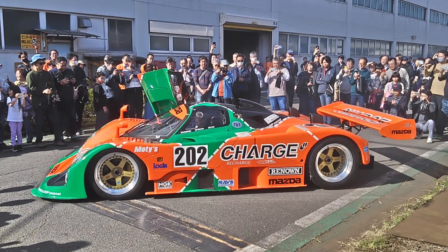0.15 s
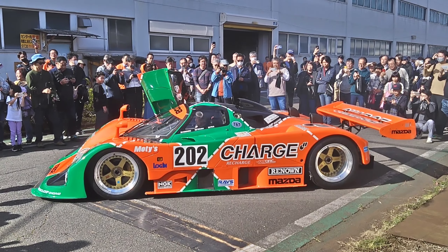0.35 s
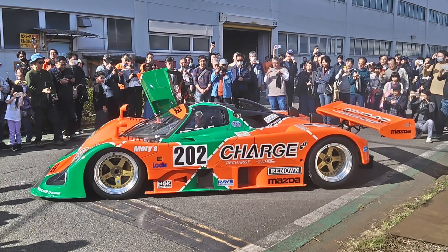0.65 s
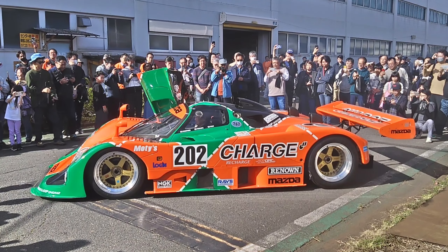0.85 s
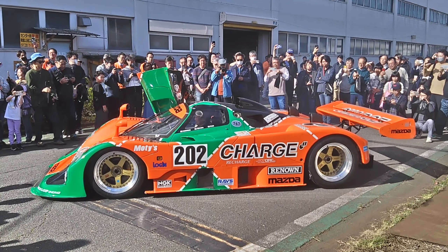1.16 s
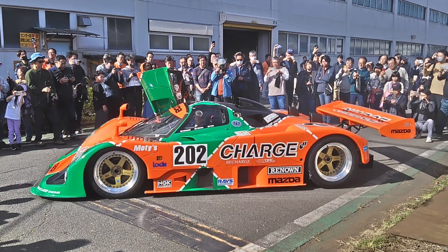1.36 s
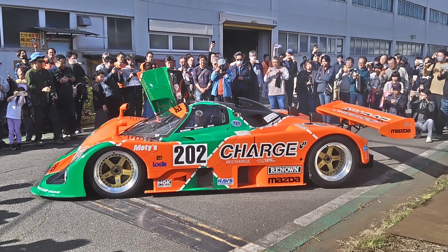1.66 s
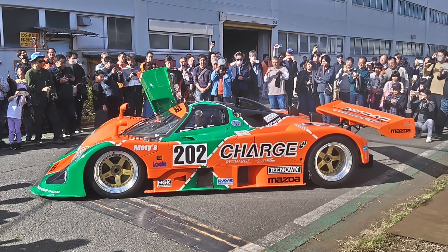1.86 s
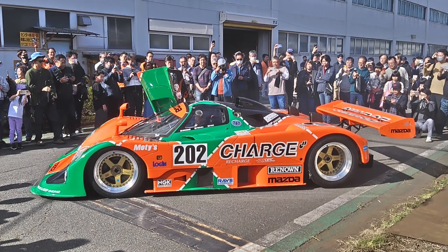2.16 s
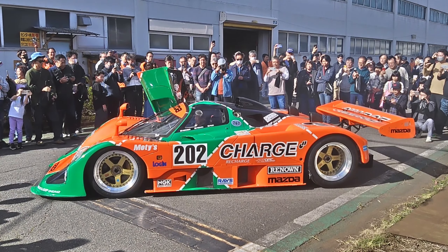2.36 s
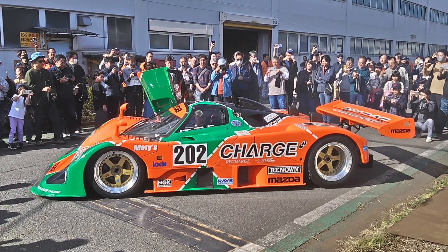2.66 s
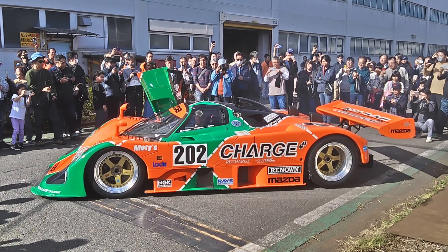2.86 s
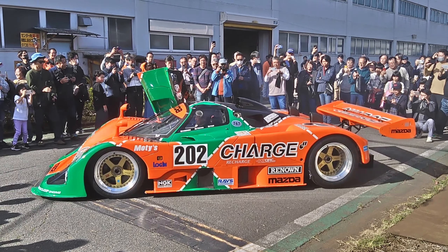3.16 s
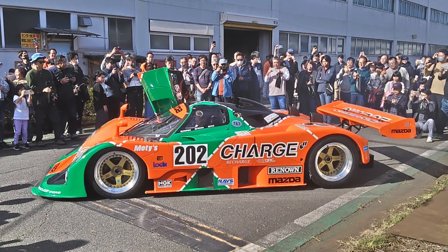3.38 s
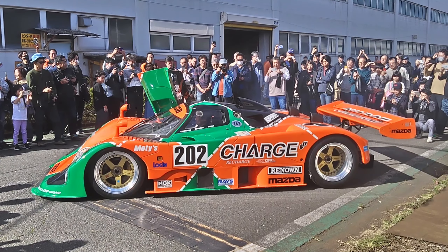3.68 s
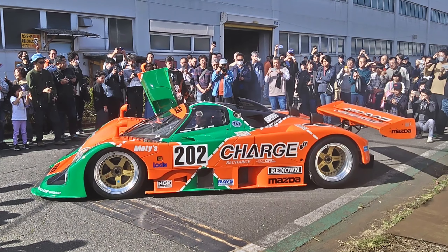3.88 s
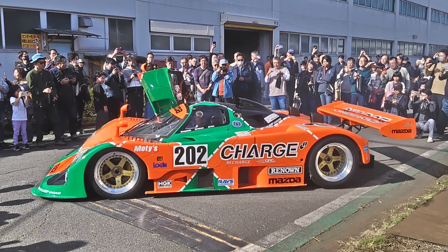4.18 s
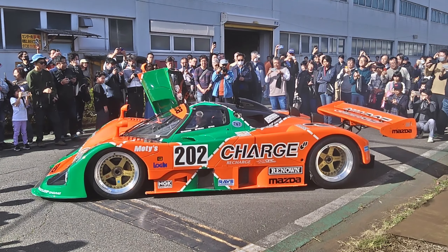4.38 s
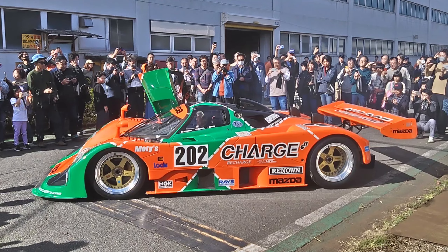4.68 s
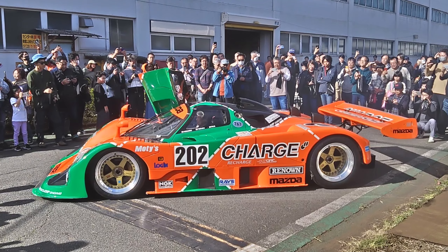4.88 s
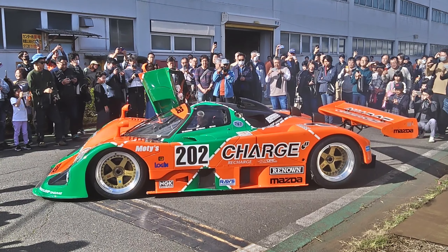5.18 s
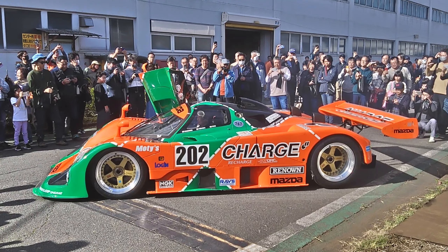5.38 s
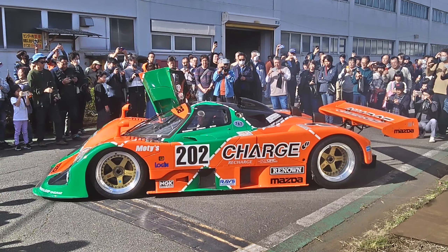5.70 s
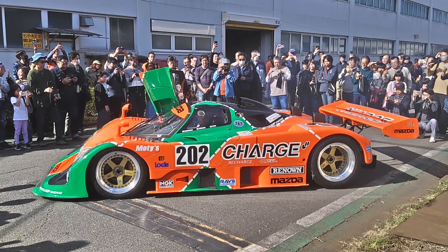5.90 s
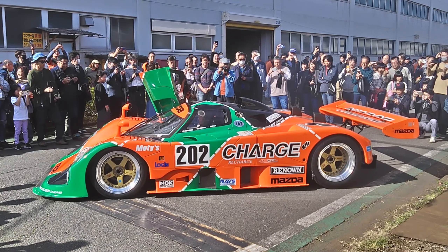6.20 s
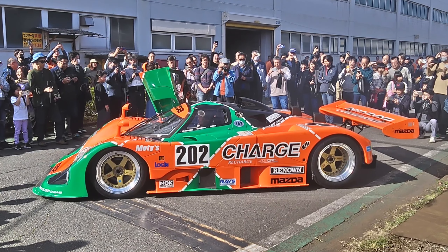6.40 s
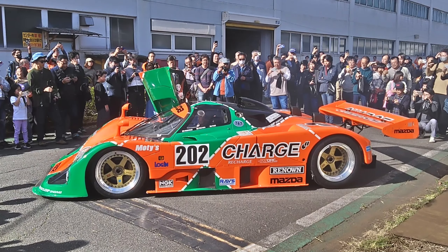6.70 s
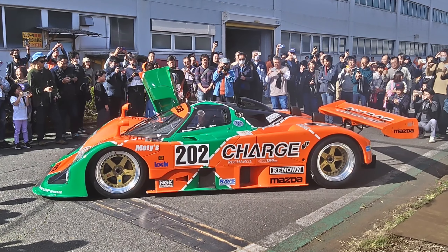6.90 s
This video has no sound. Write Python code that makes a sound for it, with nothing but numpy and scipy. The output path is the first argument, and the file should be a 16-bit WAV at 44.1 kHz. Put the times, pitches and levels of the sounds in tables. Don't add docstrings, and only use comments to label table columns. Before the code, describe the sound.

A racing rotary engine stands running in an open yard, heard in stereo from a few metres away, very loud with softly limited peaks. It begins already in a rev, lifting at about 0.1 s, then the pitch slides down in a hollow, lumpy, ringing burble. Around 0.7 s a small airy gasp and kick catch it, it stumbles, and at 0.85 s it rips upward in a raw, buzzing blare with rough exhaust roar and bright intake hiss. The same cycle returns with rips at about 1.7, 2.65, 3.55, 4.4, 5.35 and 6.25 s, each lasting only 0.1 to 0.2 s; those at 1.7 and 4.4 climb highest. Every lift brings a brief break-up and low thump before the slowing fall. A last catch comes near 7 s, with the engine still running. Tarmac and wall give short, hard echoes.

```python
import sys
import numpy as np
from scipy import signal
from scipy.fft import rfft, irfft, next_fast_len
from scipy.io import wavfile
from scipy.ndimage import uniform_filter1d

SR = 44100
rng = np.random.default_rng(int(sys.argv[2]) if len(sys.argv) > 2 else 0)


def gain_from_db(level_db):
    decades = np.asarray(level_db, float) / 20
    return 10 ** decades


def master(y):
    cut = np.clip(np.atleast_2d(y).T, -1, 1)
    pcm = np.round(cut * 32767)
    wavfile.write(sys.argv[1], SR, pcm.astype(np.int16))


N = 310905

# [f/Hz, correlation]
ALIKE = [(30, .96), (70, .78), (290, .95), (640, 0.27), (1200, 0.17), (2200, 0.56), (4000, 0.17),
         (15000, 0.1)]
# [catch t/s, lowest firing rate f/Hz, kick t/s, kick level/dB, air level/dB]
CATCHES = [
    (.66, 99.96, .74, -10, -40.5),
    (1.59, 84.85, 1.686, -12.5, -39.5),
    (2.453, 115, 2.51, -8.5, -40.5),
    (3.372, 100.9, 3.456, -7, -37.5),
    (4.27, 103.1, 4.355, -10.5, -41),
    (5.152, 107.9, 5.222, -8.5, -39),
    (6.012, 89, 6.07, -13, -41),
    (6.925, 99.97, 7.022, -8.5, -38.5),
]
# [floored t/s, pull t/s, firing rate in the stumble f/Hz, lift t/s, top firing rate f/Hz]
REVS = [
    (-.062, -.026, 110, .13, 353.1),
    (0.823, .855, 105.1, 1.0, 357),
    (1.676, 1.686, 99.1, 1.84, 453.1),
    (2.619, 2.664, 113, 2.772, 405.3),
    (3.502, 3.546, 118.1, 3.68, 408.7),
    (4.38, 4.398, 116.9, 4.548, 466),
    (5.312, 5.354, 90.95, 5.462, 361.8),
    (6.208, 6.244, 84.03, 6.352, 384.7),
]


def unit(x):
    return x / np.sqrt(np.mean(x ** 2) + 1e-20)


def along(points, hz):
    f, v = np.transpose(points)
    return np.interp(np.log(hz + 1), np.log(f + 1), v)


def filtered(x, response):
    m = next_fast_len(N + SR // 4)
    return irfft(rfft(x, m) * response(np.fft.rfftfreq(m, 1 / SR)), m)[..., :N]


def steady(x, seconds):
    size = int(seconds * SR)
    power = uniform_filter1d(uniform_filter1d(np.mean(x ** 2, axis=0), size), size)
    return x / np.sqrt(np.abs(power) + 1e-12)


def wobble(rate):
    return np.interp(np.arange(N) * rate / SR, np.arange(500), rng.standard_normal(500))


def per_sample(s, values):
    order = np.argsort(s)
    return np.interp(np.arange(N) / SR, s[order], values[order])


def patchy(x, depth_db):
    z = signal.stft(x, nperseg=1024)[2]
    field = uniform_filter1d(rng.standard_normal(z.shape[1:]), size=2, axis=0)
    field = unit(uniform_filter1d(field, size=5, axis=1))
    gain_db = depth_db * field - 6 * depth_db * (field < -.5)
    return signal.istft(z * gain_from_db(gain_db), nperseg=1024)[1][:, :N]


def rush(spectrum, gate, clean=0):
    # [f/Hz, lead of the left/rad]
    port_lead = [(0, 0), (780, 0.1), (1210, -5.0), (2070, -6.2), (3360, -6.9), (4390, 5.7), (5000, 6.3),
                 (6460, -0.2), (7410, -0.3), (8350, 3.7), (11300, 2.1), (12000, 9.8), (13300, 12.2),
                 (15900, 6.7)]

    def mid_and_side(hz):
        turn = np.arccos(np.clip(along(ALIKE, hz), -1, 1)) / 2
        return gain_from_db(along(spectrum, hz)) * [np.cos(turn), np.sin(turn)]

    pair = gate * rng.standard_normal((2, N)) + clean
    mid, side = filtered(pair, mid_and_side)
    return filtered(np.array([mid + side, mid - side]),
                    lambda hz: np.exp(.5j * along(port_lead, hz) * [[1], [-1]]))


def speed():
    kick_hz, bite_hz, pull_hz = 119.05, 121, 150.23
    stumble_s, bite_s, hang_s = .065, .025, .04
    drag_per_s, drag_grows = 1.25, 2.5
    catch, low_hz, kick, *_ = np.transpose(CATCHES)
    _, pull, sag_hz, lift, top_hz = np.transpose(REVS)
    since = np.linspace(0, 1, 12)[:, None] * (catch - lift - hang_s)
    fall = np.exp(-drag_per_s * (top_hz / 400) ** drag_grows * since)
    coast_hz = low_hz + (top_hz - low_hz) * (fall - fall[-1]) / (1 - fall[-1])
    s = [kick, pull - stumble_s, pull - bite_s, pull, lift, *(lift + hang_s + since)]
    hz = [kick_hz + 0 * kick, sag_hz, bite_hz + 0 * pull, pull_hz + 0 * pull, top_hz, *coast_hz]
    return per_sample(np.ravel(s), np.ravel(hz))


def effort(start, end, db, shape):
    before, after, attack_db, release_db = shape
    t = np.arange(0, N + 64, 64)[:, None] / SR
    rising_db = attack_db * np.clip(start - before - t, 0, None)
    dying_db = release_db * np.clip(t - end - after, 0, None)
    return per_sample(t[:, 0], np.sum(gain_from_db(2 * (db - rising_db - dying_db)), axis=1))


def levels(hz):
    # [f/Hz, level/dB]
    coasting = [(100, -20.5), (135, -25), (178, -20.5), (215, -25.5), (265, -25.5), (310, -29)]
    pulling = [(120, -10.5), (170, -12.5), (222, -8), (290, -11), (400, -12)]
    # (start before s, end after s, attack dB per s, release dB per s)
    note_rev, note_kick = (-0.0233, 0.0055, 283, 156), (0.0032, 0.0074, 170, 155)
    roar_rev, roar_kick = (-0.0455, 0.0052, 252, 197), (.01, .02, 144, 120)
    hiss_rev, hiss_kick = (-0.0361, 0.0141, 220, 163), (0.0099, 0.01, 226, 310)
    gasp, dab, miss = (-.018, .02, 650, 200), (-.018, -.015, 600, 300), (.0, .018, 200, 700)
    lumps, backfire = (0.01, 0, 496, 200), (-.004, 0, 245, 250)
    missed = 0.55

    catch, _, kick, kick_db, air_db = np.transpose(CATCHES)
    floored, _, _, lift, _ = np.transpose(REVS)
    stumble_end = np.append(floored[1:], N / SR + 1)

    def coast(db_at_100_hz, db_per_octave):
        return gain_from_db(2 * (db_at_100_hz + db_per_octave * np.log2(hz / 100)))

    note = gain_from_db(2 * along(coasting, hz)) * (1 - np.clip(missed * effort(catch, catch, 0, miss), 0, .95))
    note = note + effort(catch + 0.013, kick, kick_db - 8, gasp) + effort(kick, kick, kick_db, note_kick)
    note = note + gain_from_db(2 * along(pulling, hz)) * effort(floored, lift, 0, note_rev)

    roar = coast(-51.5, 6.5) + effort(kick, kick, air_db - 3, roar_kick) + effort(floored, lift, -18, roar_rev)

    hiss = coast(-57, 7.5) + effort(catch, kick, air_db - 3.5, gasp) + effort(kick, kick, air_db, hiss_kick)
    hiss = hiss + effort(catch, stumble_end, air_db - 8.5, dab) + effort(floored, lift, -30.5, hiss_rev)

    throb = coast(-52, 2) + effort(catch, stumble_end, -27, lumps)
    throb = throb + effort(floored, lift, -38, note_rev) + effort(lift, lift, -30.5, backfire)

    note_db, roar_db, hiss_db, throb_db = 10 * np.log10([note, roar, hiss, throb])
    return note_db, roar_db, hiss_db, throb_db, np.clip(effort(catch, stumble_end, 0, dab), 0, 1)


def firings(turns, load, scatter_db, jitter):
    # [level/dB, lateness/firings]
    rotors = [(-5, 0.0045), (-5.5, 0.026), (-6, -0.035), (-7.5, 0.0067)]
    count = np.arange(1, int(turns[-1]) - 1)
    size_db, late = np.array(rotors)[count % len(rotors)].T
    luck = rng.standard_normal((4000, 2))[count]
    uneven = 0.22 + np.interp(count, turns, load)
    at = np.interp(count + late + jitter * uneven * luck[:, 0], turns, np.arange(N))
    return np.bincount(at.astype(int), gain_from_db(size_db + scatter_db * uneven * luck[:, 1]), N)


def tone(turns, load):
    # [order, level under load/dB, level coasting/dB]
    orders = [(.25, -15.5, -16), (.5, -30, -7), (.75, -8, -28), (1, 2.5, 4), (1.5, -26, -11), (2, -3, -1.5),
              (3, -12.5, -9), (4, -11.5, -17), (5, -19.5, -45)]
    total = 0
    for k, on_db, off_db in orders:
        level_db = load * on_db + (1 - load) * off_db + (5.5 - 2 * load) * wobble(45)
        phase = 2 * np.pi * k * turns + (.35 + .2 * load) * wobble(60)
        total = total + gain_from_db(level_db) * np.cos(phase)
    return total


def pipe(f):
    # [f/Hz, width/Hz, level/dB]
    modes = [(112.4, 18, 3), (174.3, 16, 7.5), (219.2, 22.6, 3), (255.8, 19, -2.5), (324, 18, -9),
             (357, 5.9, -3), (384.3, 18.6, -3), (502.7, 16.6, 2.5), (572.6, 23.3, 1.5), (649, 6.8, -0.5),
             (710, 67, -1), (750, 20, -13.5), (771.4, 37.5, 2.5)]
    return sum((-1) ** k * gain_from_db(db) * 1j * f * w / (c * c - f * f + 1j * f * w)
               for k, (c, w, db) in enumerate(modes))


def blown(f):
    return 1j * f * 600 / (330 ** 2 - f * f + 1j * f * 600) / (1 + (f / 900) ** 8)


def yard(x, wet_db):
    # [left t/s, right t/s, level/dB]
    bounces = [
        (.0021, 0.0018, -12.5),
        (.0074, 0.0079, -19.5),
        (0.018, 0.0154, -28.5),
        (.041, .038, -23.5),
    ]
    # [f/Hz, t60/s]
    ringing = [(100, 0.27), (500, 0.3), (2000, 0.47), (10000, 0.16)]
    hz, t, (a, b) = signal.stft(rng.standard_normal((2, SR)), SR, nperseg=256)
    alike = np.clip(along(ALIKE, hz), 0, 1)[:, None]
    z = np.array([a, alike * a + np.sqrt(1 - alike ** 2) * b])
    z = z * gain_from_db(-60 * t / along(ringing, hz)[:, None])
    tail = signal.istft(z, SR, nperseg=256)[1]
    answer = np.pad(gain_from_db(wet_db) * tail / np.linalg.norm(tail[0]), ((0, 0), (1300, 0)))
    answer[:, 0] += 1
    for left, right, db in bounces:
        answer[[0, 1], [int(left * SR), int(right * SR)]] += gain_from_db(db)
    return signal.fftconvolve(x[None], answer, axes=1)[:, :N]


def exhaust_note(hz, turns, load, through, puffs, note_db, roar_db):
    # [f/Hz, level/dB per Hz]
    burble_spectrum = [(60, -27), (110, -6.5), (200, 1.5), (320, 1.5), (450, -10), (560, -6), (800, -9.5),
                       (900, -19.5), (1100, -42.5)]
    modes_fade, straight = 0.68, 1.33
    lumpy = rng.standard_normal(N) * (0.73 + 0.33 * puffs)
    burble = unit(filtered(lumpy, lambda f: gain_from_db(along(burble_spectrum, f))))
    burble = gain_from_db(.5 * (roar_db - note_db + 18.5) * (1 - through)) * burble
    rough = gain_from_db(.7 * note_db) * (gain_from_db(-15) * puffs + gain_from_db(-13) * burble)
    cut_db = -(1 - load) * np.clip(hz - 290, 0, 90) / 8
    drive = gain_from_db(.7 * note_db + cut_db) * unit(tone(turns, load)) + rough
    ringing = filtered(drive - modes_fade * through * rough, pipe)
    passing = filtered((0.08 + straight * through) * drive, blown)
    by_the_body = gain_from_db(.7 * note_db - 12) * burble
    return yard(ringing + passing + by_the_body, wet_db=-11)


def gas_roar(hz, load, pulses, puffs, roar_db, dab):
    # [f/Hz, level/dB per Hz]
    roar_spectrum = [(410, -47), (700, -2.5), (803, -7), (915, -14), (1050, -5), (1300, -11.5),
                     (1410, -9.5), (1530, -16), (1870, -13.5), (2130, -15.5), (2900, -27), (3770, -83),
                     (6380, -120)]
    roar = rush(roar_spectrum, 2.1 + 0.37 * puffs, clean=1.26 * load * unit(pulses))
    roar = patchy(roar, depth_db=3.2)
    edge = filtered(roar, lambda f: f > 2300)
    slow = np.clip((-30 - roar_db) / 14, 0, 1) * np.clip((230 - hz) / 200, .25, 1)
    return roar - edge * np.maximum(.9 * dab, slow)


def intake_hiss(puffs, hiss_db, dab):
    # [f/Hz, level/dB per Hz]
    intake_spectrum = [(1850, -13), (3150, 4), (3420, -2), (3760, -2), (4080, -2), (5460, -4.5),
                       (7080, -11), (9100, -3.5), (10700, -15.5), (14900, -22.5), (16000, -14)]
    dull_db, bright_db = -6.5, 5.5
    hiss = patchy(rush(intake_spectrum, .8 + .5 * puffs), depth_db=5)
    hiss = filtered(hiss, lambda f: 1 / (1 + (3200 / (f + 1)) ** 30))
    treble_gain = gain_from_db(0.2 * (hiss_db + 40.0) + bright_db * dab)
    hiss = hiss + filtered(hiss, lambda f: f > 10000) * (treble_gain - 1)
    return hiss + filtered(hiss, lambda f: f < 4300) * (gain_from_db(dull_db * dab) - 1)


def low_throb():
    # [f/Hz, level/dB per Hz]
    throb_spectrum = [(15, -52), (30, -1), (50, 4), (72, 18), (95, -5), (140, -46.5)]
    return rush(throb_spectrum, gain_from_db(5 * wobble(25)))


def engine():
    hz = speed()
    note_db, roar_db, hiss_db, throb_db, dab = levels(hz)
    turns = np.cumsum(hz) / SR
    load = np.clip(uniform_filter1d(np.gradient(hz) * SR, size=1300) / 500, 0, 1)
    through = np.clip(load * (hz - 130) / 120, 0, 1)
    pulses = firings(turns, load, scatter_db=2.5, jitter=.05)
    puff_s = 0.0034
    puffs = unit(signal.lfilter([1], [1, -np.exp(-1 / (puff_s * SR))], pulses))

    note = exhaust_note(hz, turns, load, through, puffs, note_db, roar_db)
    roar = gas_roar(hz, load, pulses, puffs, roar_db, dab)
    hiss = intake_hiss(puffs, hiss_db, dab)
    throb = low_throb()
    putter_db = 1.3 * (1 - through) * wobble(55)
    return (gain_from_db(note_db + putter_db) * steady(note, 0.06) + gain_from_db(roar_db) * steady(roar, 0.086)
            + gain_from_db(hiss_db) * steady(hiss, 0.075) + gain_from_db(throb_db) * steady(throb, 0.061))


def scene():
    # [f/Hz, left minus right level/dB]
    balance = [(60, 1.5), (110, -0.5), (200, 0.5), (380, -1), (700, 2), (1290, -0.5), (2380, 0.0),
               (4400, 5.5), (8120, 2), (15000, 9.5)]
    return filtered(engine(), lambda hz: gain_from_db(along(balance, hz) * np.array([[.5], [-.5]])))


def top_cut(x):
    return signal.sosfilt(signal.butter(12, 15830, fs=SR, output="sos"), x)


def record(dry):
    held = dry / (1 + np.abs(dry / .98) ** 5) ** (1 / 5)
    held = filtered(held, lambda hz: hz < 15830)
    return top_cut(held)


dry = scene()
out = record(dry)
master(out)
```